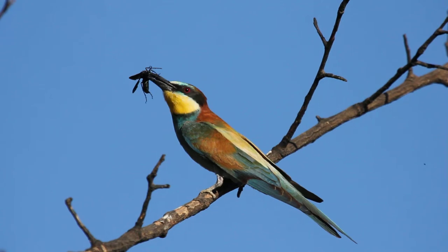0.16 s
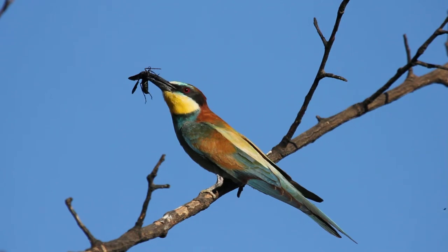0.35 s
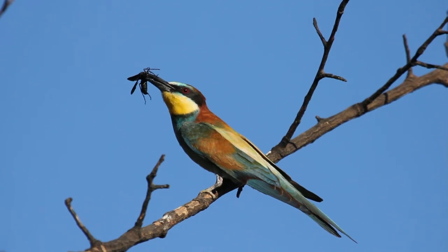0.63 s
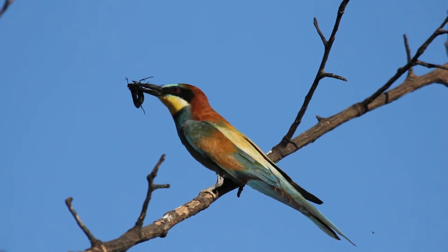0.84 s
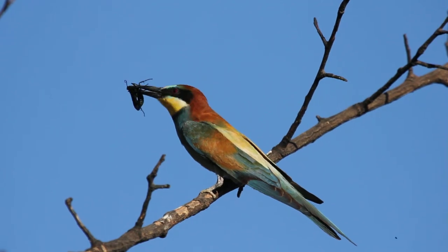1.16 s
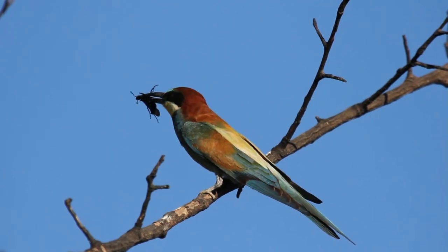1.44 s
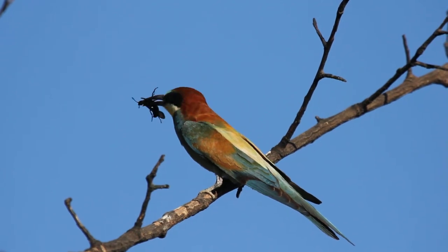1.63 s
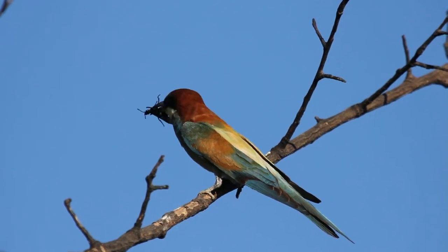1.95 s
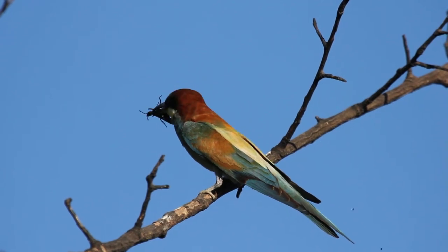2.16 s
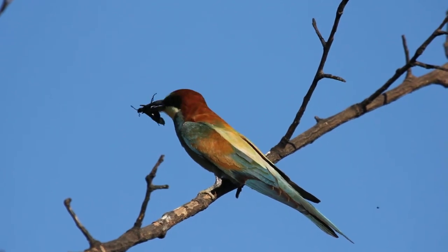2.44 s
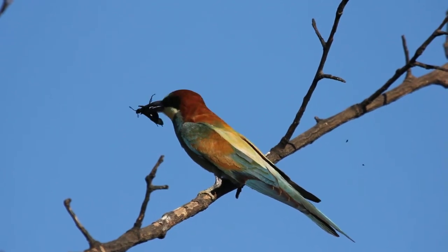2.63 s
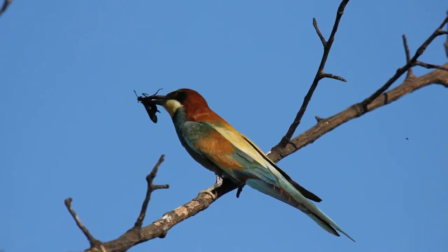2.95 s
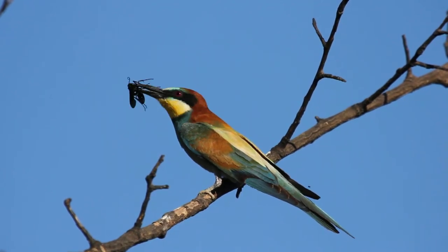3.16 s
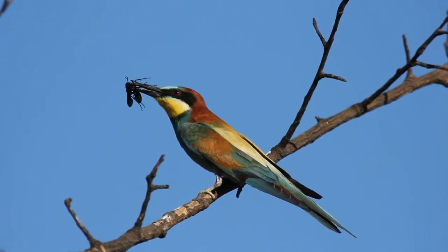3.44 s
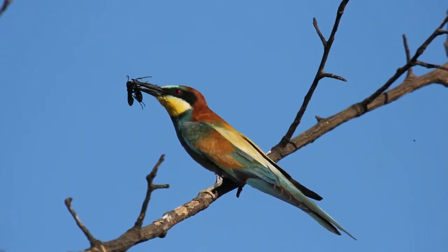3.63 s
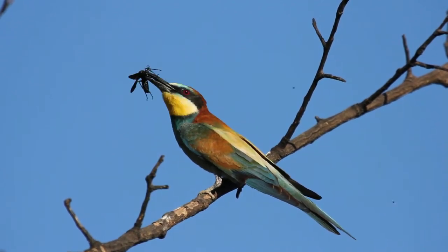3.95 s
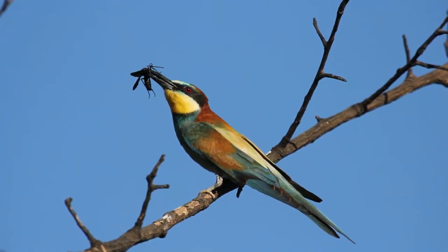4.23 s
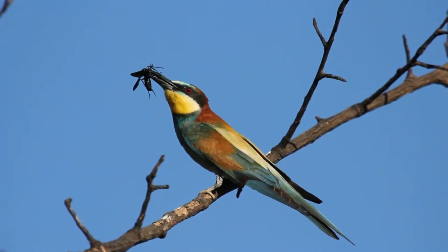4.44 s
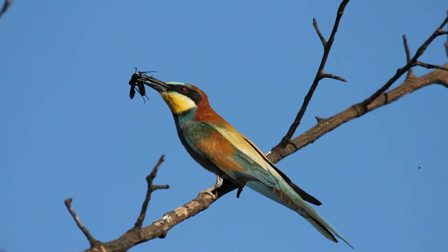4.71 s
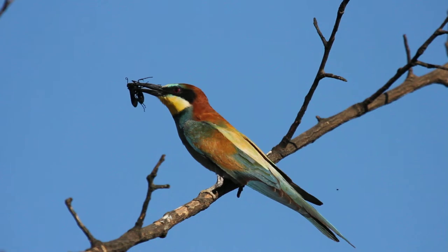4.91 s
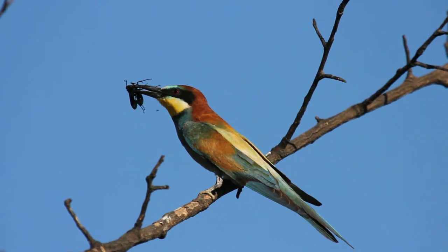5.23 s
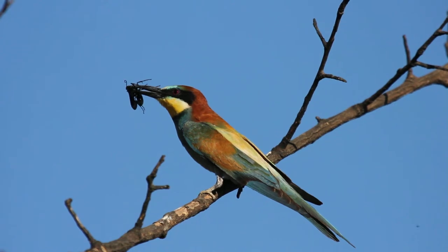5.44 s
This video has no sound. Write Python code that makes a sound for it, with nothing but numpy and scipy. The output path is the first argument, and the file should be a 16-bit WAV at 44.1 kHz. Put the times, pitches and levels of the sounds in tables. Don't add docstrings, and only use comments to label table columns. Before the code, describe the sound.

Near bee-eaters give rounded, nearly pure whistles of a fraction of a second, some arched, some climbing, some rolling with upward flicks. Farther birds answer softly and one repeats a two-part call. The loudest burst comes around two and a half seconds, then calls are sparser until a last cluster near the end. Soft colony twitter, crickets, far hoots and airy hiss fill the open space; one tiny tick occurs late.

```python
import sys
import numpy as np
from scipy import signal
from scipy.fft import rfft, irfft
from scipy.io import wavfile
from scipy.ndimage import uniform_filter1d

SR = 44100
rng = np.random.default_rng(int(sys.argv[2]) if len(sys.argv) > 2 else 0)


def file_out(sig):
    cols = np.atleast_2d(sig).T
    lim = np.clip(cols, -1, 1)
    pcm = np.round(lim * 32767).astype(np.int16)
    wavfile.write(sys.argv[1], SR, pcm)


def volts_from_db(level):
    exponent = np.asarray(level, float) / 20
    return 10 ** exponent


N = 246078

# centre_hz, width_hz, level_db
BEAK = [(5800, 350, 0), (9100, 250, -6), (11800, 450, -5), (14400, 350, -5)]

# from_top_s, pitch_hz, level_db
ARCH = [(-.045, 1513, -40), (-.033, 1714, -11), (-.024, 1820, -24), (-.011, 1930, -10), (0.0, 2012, 0),
        (.005, 1950, -1.5), (.009, 1850, -30), (.017, 1710, -10), (.026, 1520, -40)]
PIP = [(-.031, 1457, -32), (-.019, 1804, -11.5), (-.016, 1830, -30), (-.011, 1950, -30), (-.008, 2270, -1),
       (-.004, 2390, -1), (0.0, 2640, -2.5), (.007, 2340, -3.5), (.013, 1950, -22)]
CLIMB = [(-.062, 1445, -30), (-.051, 1658, -14.5), (-.043, 1730, -29), (-.025, 1870, -4),
         (-.018, 1920, -19), (-.014, 1946, -4.5), (0.0, 2290, 0.5), (.005, 2030, -4.5), (.022, 1650, -28)]
TAIL = [(0.0, 1870, -2), (.002, 2010, 0), (.006, 1980, -15), (.01, 1820, -2), (.014, 1890, -20),
        (.022, 1630, -21), (.029, 1290, -29)]
# figure, top_s, level_db, pace_factor, path_index
FIGURES = [
    (TAIL, 0, -19.5, 0.99, 0),
    (ARCH, 1.23, -19, 1, 1),
    (CLIMB, 1.802, -23.5, 1, 2),
    (ARCH, 2.649, -18.5, 0.91, 1),
    (PIP, 3.546, -22.5, 0.98, 0),
    (PIP, 5.22, -25, 1, 0),
]
# second_partial_db, higher_partials_db, ground_echo_ms, echo_db
FIGURE_PATHS = [(-80, -85, 4.5, -16), (-80, -62.5, 4, -18), (-80, -85, 10, -10)]

# start_s, length_s, level_db, first_pitch_hz, last_pitch_hz
NEAR_ROLLS = [
    (1.028, .1, -33.5, 1440, 1470),
    (2.084, .101, -30, 1470, 1460),
    (2.567, .064, -27.5, 1560, 2005),
    (4.599, .11, -34.5, 1270, 990),
    (5.449, .044, -35, 1440, 1970),
]
# second_partial_db, higher_partials_db, ground_echo_ms, echo_db
ROLL_PATHS = [(-80, -85, 4.1, -11), (-78, -85, 10.6, -15), (-72, -78, 4, -17), (-55, -62, 3.6, -10),
              (-80, -85, 4, -15)]
# top_s, height_hz, length_s, level_change_db
NEAR_FLICKS = [(1.054, 270, .02, -.5), (1.08, 590, .025, .5), (1.101, 150, .022, 2.5), (2.11, 530, .021, 1),
               (2.134, 650, .028, -2.5), (2.156, 180, .02, 2), (2.616, 410, .031, .5),
               (4.625, 290, .015, -2), (4.646, 330, .019, 4.5), (4.673, 330, .017, 1.5),
               (5.473, 140, .015, 4), (5.481, 600, .02, -.5)]
# start_s, length_s, level_db, first_pitch_hz, last_pitch_hz
FAR_ROLLS = [(0.091, .16, -46, 1870, 1720), (0.419, .064, -42, 1900, 2010), (.488, .061, -38, 1970, 2010),
             (.553, .026, -42, 2010, 1600), (.657, .034, -42, 1640, 1950), (1.424, .021, -38, 1900, 2010),
             (1.453, .086, -41, 2010, 1620), (1.755, .035, -37.5, 1810, 2010),
             (1.846, .068, -41, 1560, 2010), (1.918, .034, -39, 2010, 2010), (1.963, .045, -37, 2010, 1620),
             (2.058, .03, -40.5, 1760, 1950), (2.185, .027, -44, 2010, 2010),
             (3.221, 0.041, -42.5, 1740, 1800), (4.136, 0.031, -53, 1765, 1860),
             (5.068, 0.029, -43.5, 1800, 2010)]
# top_s, height_hz, length_s, level_change_db
FAR_FLICKS = [(.196, 720, .03, -7), (.213, 450, .02, -6), (.477, 560, .018, -8), (.525, 940, .044, -16),
              (.543, 250, .012, 5), (.678, 340, .02, -1), (1.44, 700, .014, -12), (1.456, 220, .012, -3),
              (1.479, 330, .016, -3), (1.492, 600, .026, -9), (1.517, 610, .028, -10), (1.771, 200, .02, 1),
              (1.89, 0, .05, 7), (1.907, 460, .016, -7), (1.92, 420, .014, -8), (1.945, 440, .02, -3),
              (1.971, 450, .022, -3), (1.986, 330, .02, -12), (2.076, 300, .02, -2), (2.199, 140, .02, 2),
              (3.243, 230, .022, -2), (4.15, 450, .022, 0), (5.083, 140, .02, 0)]

# from_top_s, pitch_hz, level_db
PHRASE = [(-.032, 1474, -12.5), (-.022, 1725, -8), (-.018, 1756, -36), (-.013, 1790, -5), (-.006, 2000, 1),
          (0.0, 2210, -5), (.008, 1950, 2), (.017, 1700, -8), (0.021, 1560, -30)]
# top_s, level_db, pitch_factor, bank_echo_ms
REPEATS = [(.333, -33, 0.98, 9.9), (.607, -31.5, 1.01, 10), (.882, -30, 1.025, 6.5), (1.001, -44, 1.05, 11),
           (1.398, -33, .97, 10.6), (2.547, -42.5, 1.046, 11.7), (2.846, -50, 1.04, 14),
           (2.989, -34.5, .99, 9.9), (3.359, -32.5, .99, 7.3), (4.288, -30.5, 1, 9.7),
           (5.386, -33.5, 0.97, 10)]
# start_s, length_s, pitch_hz, level_db
SCRAPS = [(.69, 0.023, 2100, -46.5), (0.953, 0.036, 2180, -48), (1.128, .03, 2073, -43),
          (1.31, 0.042, 2000, -49), (1.905, .03, 1820, -45), (2.718, 0.028, 1855, -47),
          (3.439, 0.024, 2100, -54), (4.368, .04, 1986, -50), (4.416, .04, 1715, -49.5),
          (4.853, 0.031, 2034, -50), (5.174, .025, 2060, -47)]
# time_s, level_db
COLONY = [(0.0, -46), (0.64, -47), (0.92, -52), (1.35, -45.5), (1.7, -54.5), (1.97, -45), (2.33, -48.5),
          (2.56, -55), (2.73, -47), (4.02, -49.5), (5.58, -48)]

# time_s, pitch_hz, level_db
SONGBIRD = [
    [(.07, 6350, -72), (.125, 6550, -68), (.16, 6750, -72)],
    [(.37, 6750, -68), (.392, 6200, -81), (.398, 6150, -62), (.415, 5970, -61), (.425, 5930, -74),
     (.44, 6060, -68), (.472, 6060, -64), (.48, 6010, -74)],
]
# middle_s, length_s, top_pitch_hz, end_pitch_share, level_db
HOOTS = [(.6, .1, 515, 0.9, -58), (.83, .1, 474, .98, -61.5), (1.009, .08, 463, 1, -57),
         (1.55, .16, 553, 0.89, -58), (1.82, .1, 517.5, 1, -64), (2.14, .1, 500.5, 0.96, -58),
         (2.45, .1, 495, 0.72, -61), (2.98, .17, 547, 0.83, -58), (3.3, 0.097, 515.4, 0.98, -60),
         (3.56, 0.18, 556, 0.82, -59.5), (3.92, .1, 515, 0.94, -56), (4.39, .1, 540, 0.93, -57),
         (4.71, .07, 512, 0.9, -57.5), (4.93, 0.19, 575, 0.83, -59.5), (5.35, 0.081, 519, 0.91, -55)]
# pitch_hz, chirps_per_s, pulses_per_s, first_chirp_s, level_db
CRICKETS = [
    (5350, 4.55, 30, .08, -59.5),
    (5290, 3.7, 28.5, .2, -65),
    (5700, 4.1, 31, .05, -66),
    (5560, 3.3, 27, .15, -70),
    (5900, 4.9, 33, .11, -71),
]
# time_s, peak_db
TICK = [
    (4.0936, -45),
]

# frequency_hz, level_db_per_hz
AIR = [(20, -40), (35, -12), (65, -5), (200, -8.5), (460, -5), (850, -6.5), (1400, -3.5), (2200, -4.5),
       (3300, -7.5), (4800, -14), (5600, -12.5), (6600, -20.5), (12500, -26.5), (15500, -29)]
# time_s, level_db
RUMBLE = [
    (0.0, -54.5),
    (0.5, -53.5),
    (0.65, -58.5),
    (1.07, -54.5),
    (2.27, -58.5),
    (2.92, -55.5),
    (5.28, -57.5),
    (5.53, -53),
    (5.58, -61.5),
]
# centre_hz, width_hz, last_s, level_db
DRONE = [
    (370, 45, 0.64, -60),
    (216.5, 28, 1.33, -61),
]

HOLD_HZ, GLIDE_UP_S, GLIDE_DOWN_S = 2005, .0095, .013
SWELL_S, SWELL_DB = .01, 1.5
EDGE_LOSS_DB, FULL_GLIDE_HZ = 24, 500
FLICK_RISE_SHARE = .47
TRILL_GAIN_DB, TRILL_EDGE_S = 7.5, .003

BANKS_T60_S, BANKS_DB = 0.37, -21.5
BUSHES_T60_S, BUSHES_DB = .12, -16


def rms_one(x):
    return x / np.sqrt(np.mean(x ** 2) + 1e-20)


def in_time(rows):
    s, level_db = np.transpose(rows)
    return np.interp(np.arange(N) / SR, s, level_db)


def add(out, sound, s):
    at = max(round(s * SR), 0)
    out[at:at + len(sound)] += sound[:N - at]


def drift(rate_hz):
    knots = rng.standard_normal(600)
    return np.interp(np.arange(N) / SR * rate_hz, np.arange(600), knots)


def scatter(x, t60_s):
    t = np.arange(SR // 2) / SR
    swarm = rng.standard_normal(len(t)) * volts_from_db(-60 * t / t60_s) * np.minimum(t / 0.0078, 1)
    return signal.fftconvolve(x, swarm / np.sqrt(np.sum(swarm ** 2)))[:N]


def whistle(rows, second_db=-99, higher_db=-99, echo_ms=4, echo_db=-60, tilt_db=0, flutter_db=0):
    s, hz, level_db = np.transpose(rows)
    t = s[0] + np.arange(round((s[-1] - s[0]) * SR)) / SR
    hz = uniform_filter1d(np.interp(t, s, hz), size=90, mode="nearest")
    phase = 2 * np.pi * np.cumsum(hz) / SR

    since_start = t - s[0] + (s[0] <= 0)
    fade = np.clip(np.minimum(since_start, s[-1] - t) / 0.0042, 0, 1)
    shimmer = np.interp(t - s[0], np.arange(60) / 220, rng.standard_normal(60))
    tone = np.cos(phase) * np.interp(t, s, volts_from_db(level_db)) * volts_from_db(flutter_db * shimmer) * fade

    effort = signal.windows.tukey(len(t), .3) * volts_from_db(4.5 * shimmer[::-1])
    upper = volts_from_db(second_db) * np.cos(2 * phase)
    for k in range(3, 10):
        resonance = sum(volts_from_db(db) * np.exp(-((k * hz - centre) / width) ** 2) for centre, width, db in BEAK)
        upper += volts_from_db(higher_db) * np.cos(k * phase) * resonance

    lag = np.zeros(round(echo_ms * SR / 1000))
    echo = volts_from_db(echo_db + tilt_db * (hz - 2100) / 100) * tone
    return np.sqrt(2) * (np.r_[tone + upper * effort, lag] + np.r_[lag, echo])


def roll(flicks, trill_db, start, length, level_db, first_hz, last_hz):
    s = np.linspace(start, start + length, 120)
    hz = HOLD_HZ
    db = level_db - SWELL_DB * np.exp((start - s) / SWELL_S)

    glide_up = np.exp((start - s) / GLIDE_UP_S)
    glide_down = np.exp((s - s[-1]) / GLIDE_DOWN_S)
    for edge_hz, share in (first_hz, glide_up), (last_hz, glide_down):
        depth = HOLD_HZ - edge_hz
        hz = hz - depth * share
        db = db - EDGE_LOSS_DB * min(depth / FULL_GLIDE_HZ, 1) * share ** 2.5

    own = [flick for flick in flicks if start <= flick[0] <= s[-1]]
    for top, height_hz, flick_s, change_db in own:
        side = flick_s * np.where(s < top, FLICK_RISE_SHARE, 1 - FLICK_RISE_SHARE)
        lift = np.cos(np.pi / 2 * np.clip(np.abs(s - top) / side, 0, 1) ** 1.15) ** 2
        hz = hz + height_hz * lift
        db = db + change_db * lift

    if trill_db:
        after_first = s - own[0][0] + own[0][2] * .45
        before_last = own[-1][0] + own[-1][2] * .35 - s
        db = db + trill_db * np.clip(np.minimum(after_first, before_last) / TRILL_EDGE_S, 0, 1)
    return np.c_[s, hz, db]


def near_figures():
    out = np.zeros(N)
    for figure, s, level_db, pace, path in FIGURES:
        rows = np.array(figure) * [pace, 1, 1] + [s, 0, level_db]
        add(out, whistle(rows, *FIGURE_PATHS[round(path)], flutter_db=.8), rows[0, 0])
    return out


def colony(count=260):
    out, t = np.zeros(N), np.arange(SR // 8) / SR
    s, hz, level_db = np.transpose(PHRASE)
    for when, pitch, pace, size in rng.random((count, 4)):
        steps = (s - s[0]) * (.7 + 0.902 * pace)
        call_hz = np.interp(t, steps, hz) * (.9 + .35 * pitch)
        phase = 2 * np.pi * np.cumsum(call_hz) / SR
        envelope = np.interp(t, steps, volts_from_db(level_db + 5.5 * size), right=0)
        add(out, envelope * np.sin(phase), when * N / SR)
    out = 0.69 * out + scatter(out, t60_s=0.8)
    return volts_from_db(in_time(COLONY) - 5.0) * rms_one(out)


def air():
    hz = np.maximum(np.fft.rfftfreq(N, 1 / SR), 1)
    colour_hz, colour_db = np.transpose(AIR)
    colour = volts_from_db(np.interp(np.log(hz), np.log(colour_hz), colour_db))
    hiss = rms_one(irfft(rfft(rng.standard_normal(N)) * colour, N))
    bass = signal.sosfiltfilt(signal.butter(2, 430, fs=SR, output="sos"), hiss)
    swell_db = in_time(RUMBLE) - np.min(np.array(RUMBLE)[:, 1])
    return volts_from_db(-48.5) * (hiss + (volts_from_db(swell_db) - 1) * bass)


def drone():
    out, t = np.zeros(N), np.arange(N) / SR
    for hz, width, until, level_db in DRONE:
        band = signal.butter(2, [hz - width / 2, hz + width / 2], "band", fs=SR, output="sos")
        hum = rms_one(signal.sosfilt(band, rng.standard_normal(N)))
        out += volts_from_db(level_db) * hum * np.clip((until - t) / 0.16, 0, 1)
    return out


def crickets():
    t, out = np.arange(N) / SR, np.zeros(N)
    for hz, chirps, pulses, first, level_db in CRICKETS:
        since = (t - first) % (1 / chirps)
        strokes = np.maximum(np.sin(2 * np.pi * pulses * since), 0) * (since < 4 / pulses)
        phase = 2 * np.pi * np.cumsum(hz + 40 * drift(40)) / SR
        out += volts_from_db(level_db + 2.5 * drift(6)) * strokes * np.sin(phase)
    return out + .6 * scatter(out, t60_s=.12)


def songbird():
    out = np.zeros(N)
    for rows in SONGBIRD:
        add(out, whistle(rows, flutter_db=2.5), rows[0][0])
    return out


def far_rolls():
    out = np.zeros(N)
    for call in FAR_ROLLS:
        rows = roll(FAR_FLICKS, 0, *call)
        add(out, whistle(rows, echo_ms=7.3, echo_db=-9, flutter_db=2.7), call[0])
    return out


def repeating_bird():
    out = np.zeros(N)
    for s, level_db, pitch, echo_ms in REPEATS:
        rows = np.array(PHRASE) * [1, pitch, 1] + [s, 0, level_db]
        flutter_db = 2.2 if level_db > -36 else 4
        call = whistle(rows, echo_ms=echo_ms, echo_db=-4, tilt_db=3.5, flutter_db=flutter_db)
        add(out, call, rows[0, 0])
    return out


def dove():
    out = np.zeros(N)
    for s, length, hz, ends, level_db in HOOTS:
        rows = [(.01, ends * hz, level_db - 4), (.4 * length, hz, level_db),
                (.6 * length, hz, level_db), (length, ends * hz, level_db - 4)]
        add(out, whistle(rows, echo_ms=23, echo_db=-3), s - length / 2)
    return out


def scraps():
    out = np.zeros(N)
    for s, length, hz, level_db in SCRAPS:
        rows = [(s, .93 * hz, level_db - 11),
                (s + length / 2, hz, level_db),
                (s + length, 0.996 * hz, level_db - 17)]
        add(out, whistle(rows, echo_ms=9.1, echo_db=-14.0, flutter_db=3.5), s)
    return out


def near_rolls():
    out = np.zeros(N)
    for call, path in zip(NEAR_ROLLS, ROLL_PATHS):
        rows = roll(NEAR_FLICKS, TRILL_GAIN_DB, *call)
        add(out, whistle(rows, *path, flutter_db=.8), call[0])
    return out


def tick():
    out, t = np.zeros(N), np.arange(300) / SR
    treble = signal.butter(2, 9500, "high", fs=SR, output="sos")
    burst = signal.sosfilt(treble, rng.standard_normal(len(t)))
    for s, peak_db in TICK:
        add(out, volts_from_db(peak_db - 1) * burst * volts_from_db(-60 * t / .012), s)
    return out


def scene():
    calls = near_figures() + far_rolls() + repeating_bird() + scraps() + near_rolls()
    bushes = volts_from_db(BUSHES_DB) * scatter(calls, BUSHES_T60_S)
    banks = volts_from_db(BANKS_DB) * scatter(calls, BANKS_T60_S)
    birds = calls + bushes + banks + colony() + songbird() + dove()
    return (birds + crickets() + tick() + drone() + air())[None]


def roll_off(x):
    return signal.sosfilt(signal.butter(12, 15640, fs=SR, output="sos"), x)


def record(dry):
    return roll_off(dry)


dry = scene()
out = record(dry)
file_out(out)
```